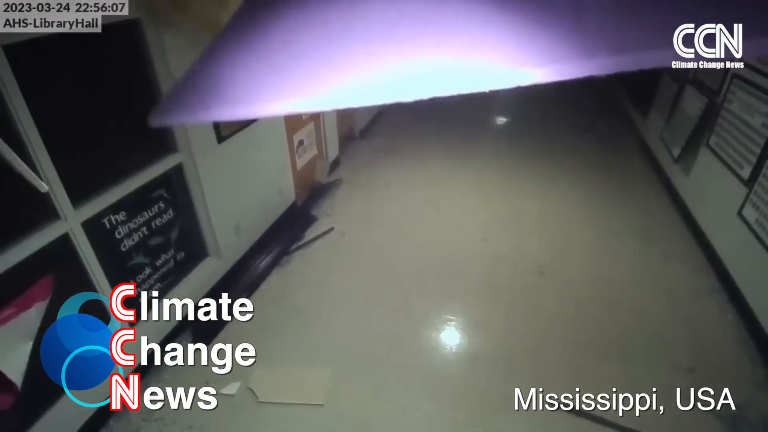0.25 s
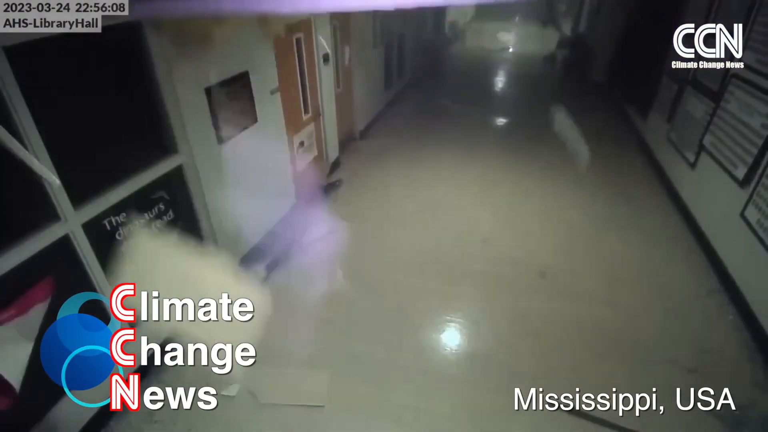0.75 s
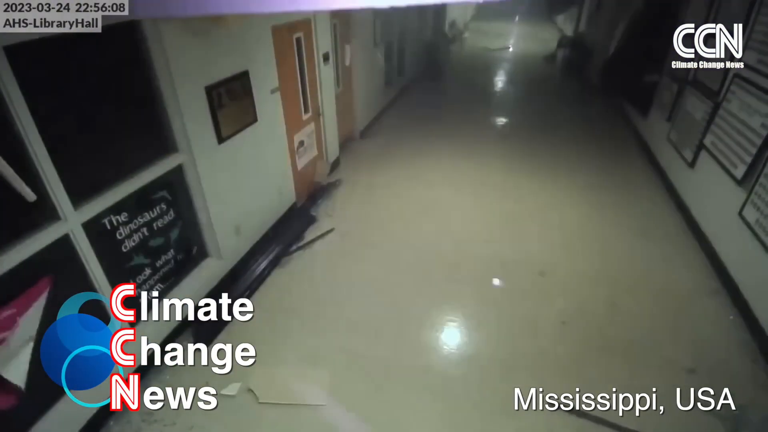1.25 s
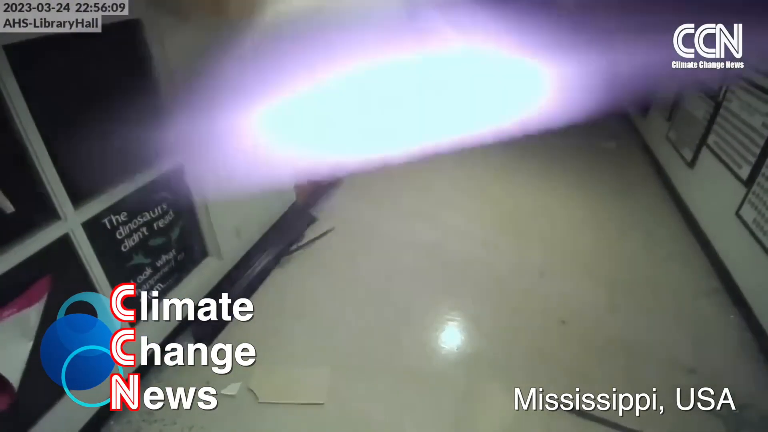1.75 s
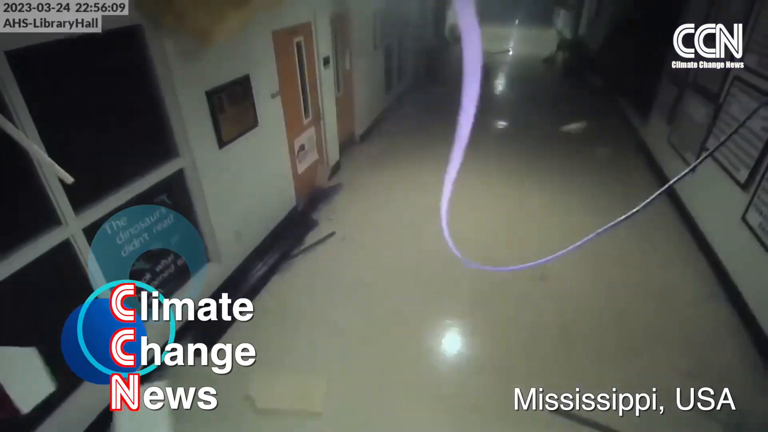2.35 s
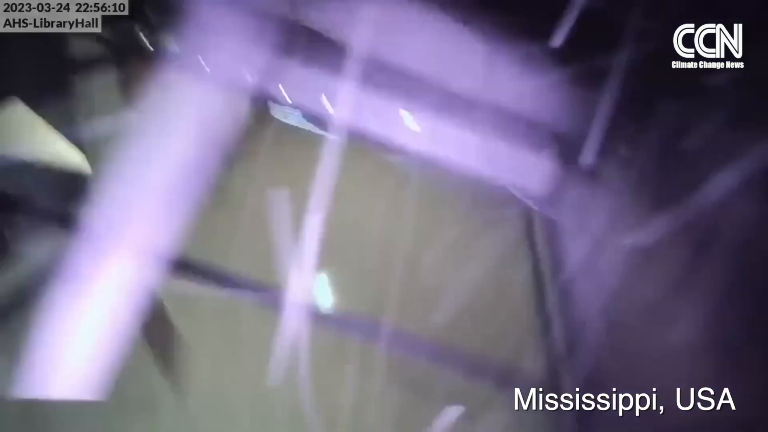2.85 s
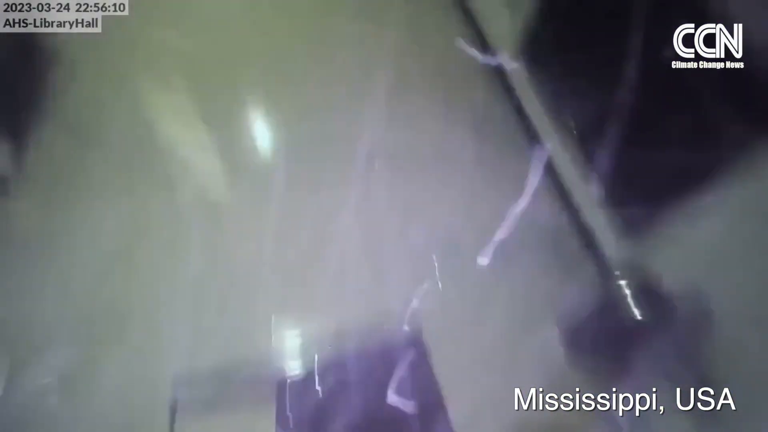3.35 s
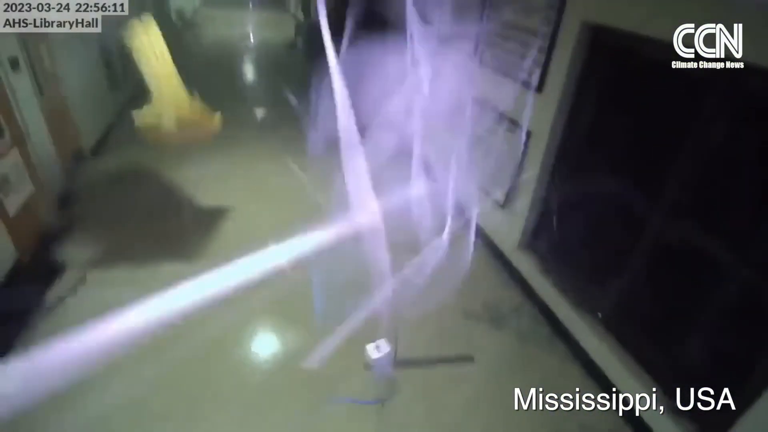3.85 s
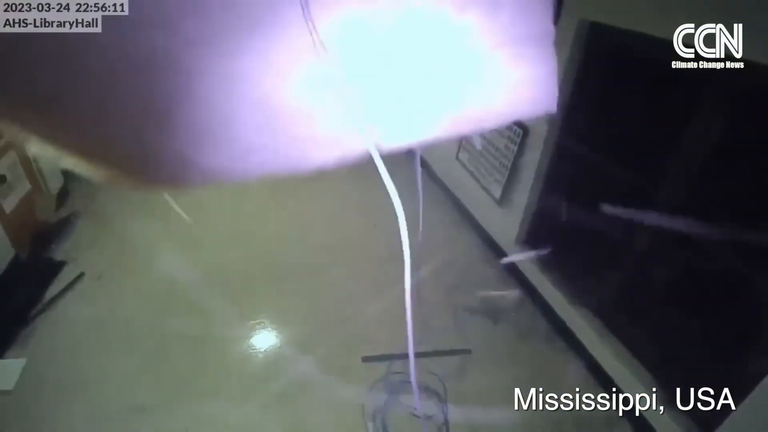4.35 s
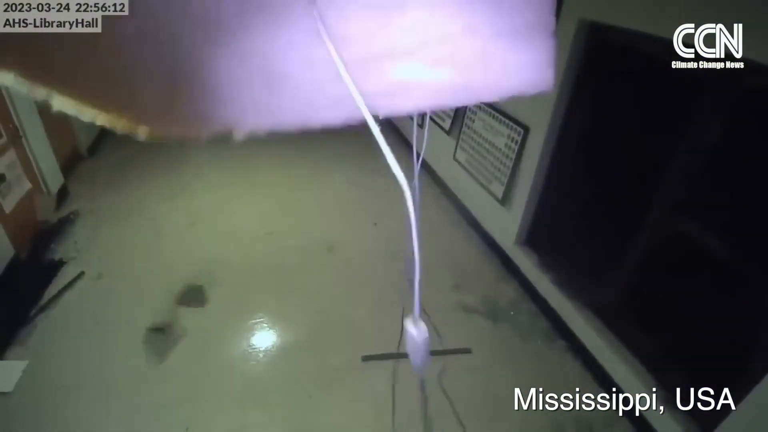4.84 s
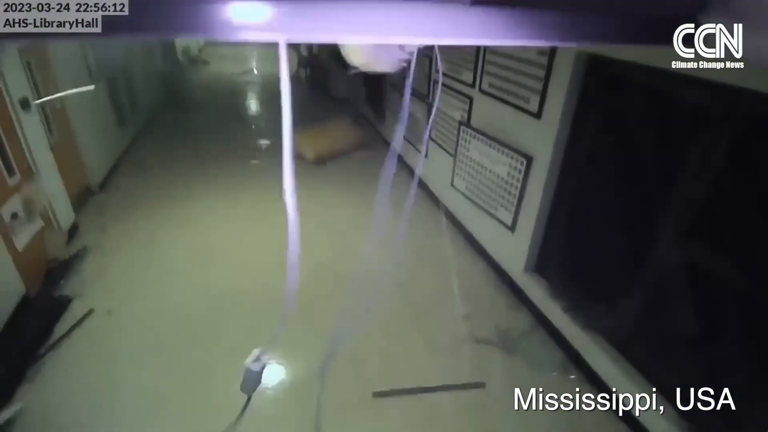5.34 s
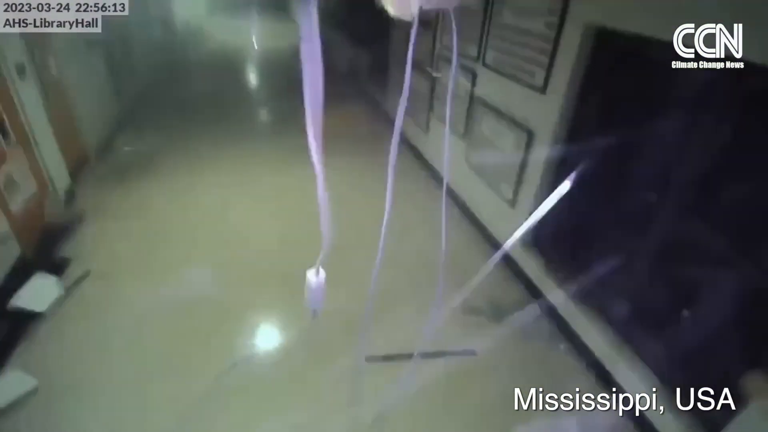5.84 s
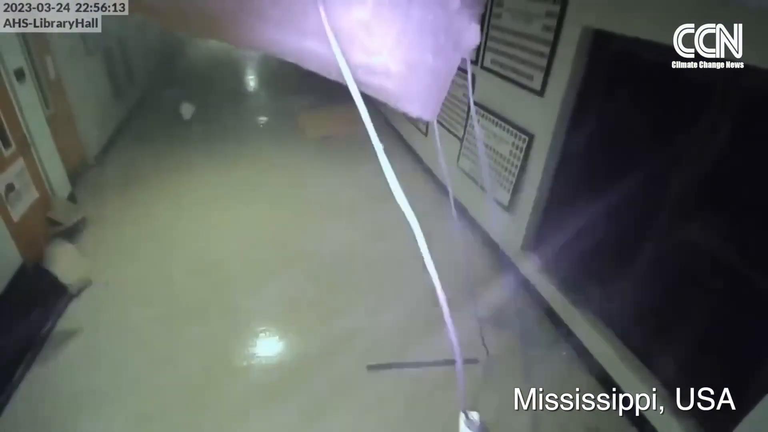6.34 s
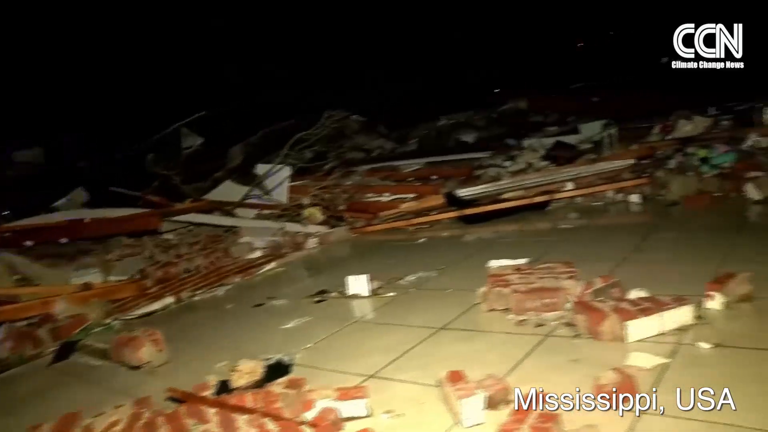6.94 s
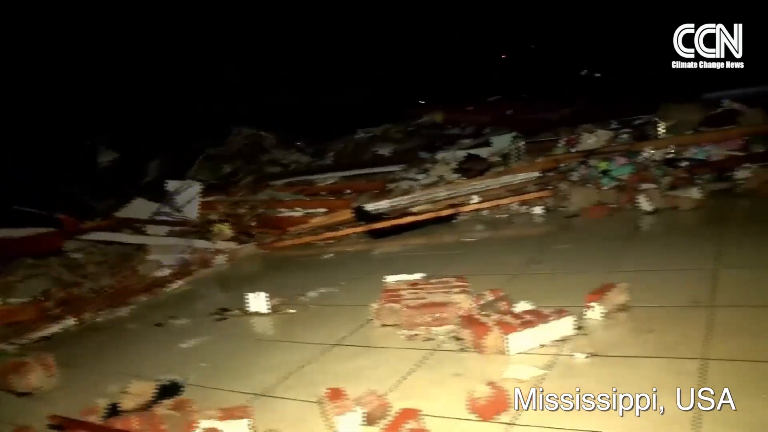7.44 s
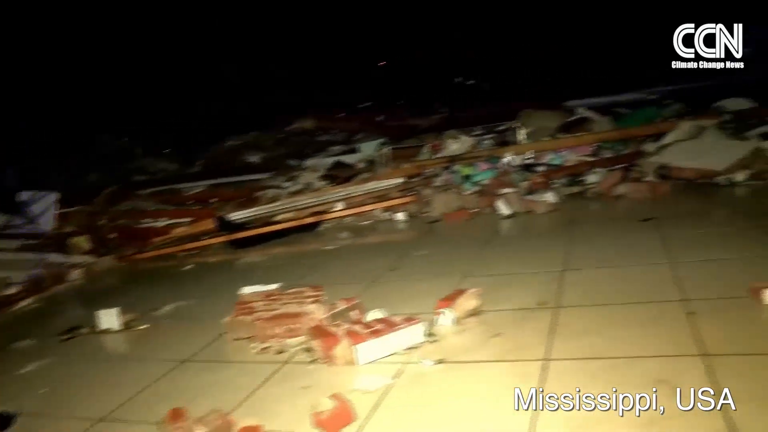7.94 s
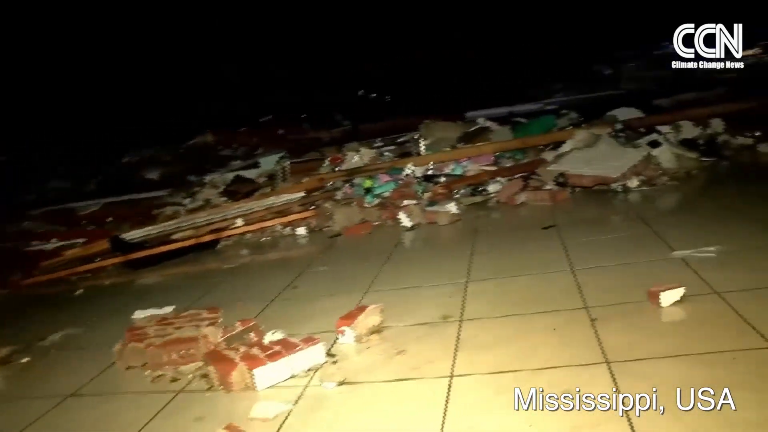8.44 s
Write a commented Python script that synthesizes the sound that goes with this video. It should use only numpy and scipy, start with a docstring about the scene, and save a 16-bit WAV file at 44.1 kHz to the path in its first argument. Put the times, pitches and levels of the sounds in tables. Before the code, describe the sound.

From the first instant, tornado wind tears through a hallway, overloading a fixed microphone into flat, crackling, dull-topped distortion in both channels. Heavy gusts pound at 0.1-0.4 s; a hollow low howl swells near 0.7 s and fades. From 1.2 to about 2.9 s the buffeting is fiercest, with hard pushes that choke the hiss and break into sputters. Around 3-3.5 s bright debris scrapes and a rapid panel flutter pass. From 3.7 to 5.3 s dusty hiss shows between separate surges, one strong near 4.75 s. Flapping beats return at 5.5-6 s, with a sharp scrape at 6.2 s. At 6.67 s everything cuts to quiet outdoors, left channel only: faint rush, thin whines, small bumps and metal clinks around 7-7.2 s, a dull handling knock near 7.8 s, then soft puffy gusts around 8-8.2 s and light bumps until the end.

```python
"""A school hallway in a tornado: turbulent pressure drives a security camera's microphone from rail to rail, and
the hiss of dust and debris comes through where the buffeting eases. Then a sudden cut to the wreckage outdoors:
soft gusts bump a hand-held microphone over a faint rush, on the left channel only. Wind is noise shaped by eddy
rate, debris is banded noise, loose metal is a sum of modes; the hallway is hard-clipped, with added noise that
follows the clipped signal's slope."""
import sys
import numpy as np
from scipy import signal
from scipy.fft import rfft, irfft, next_fast_len
from scipy.io import wavfile
from scipy.ndimage import uniform_filter1d, map_coordinates

SR = 44100
rng = np.random.default_rng(int(sys.argv[2]) if len(sys.argv) > 2 else 0)


def dump_mix(stems):
    """Bounce the given channels to the path in sys.argv[1] as a 16-bit WAV at rate SR."""
    frames = np.atleast_2d(stems).T  # one column per channel
    limited = np.clip(frames, -1, 1)  # hard clip at full scale
    pcm = np.round(limited * 32767).astype(np.int16)
    wavfile.write(sys.argv[1], SR, pcm)


N = 383229
TIME = np.arange(N) / SR  # s
CUT_S = 6.673  # the hallway gives way to the outdoors
HALLWAY_TOP_HZ, TOP_HZ = 6200, 15000  # band limits of the hallway part and of the whole sound

# Modes of a loose metal sheet. Each row: frequency in Hz, level in dB.
SHEET = [(4320, 2), (7480, -3), (9950, -6)]
# Modes of a loose metal rod. Each row: frequency in Hz, level in dB.
ROD = [(7570, 2), (8140, 0), (8450, -2), (9400, -4), (10530, -13)]


def amp(db):
    """A level in decibels is twenty times the logarithm of the gain returned here."""
    return 10 ** (np.asarray(db) / 20)


def unit(x):
    """Dividing by the root mean square gives a signal of rms 1."""
    return x / np.sqrt(np.mean(x ** 2) + 1e-20)


def gain(points, hz):
    """A frequency response drawn through (Hz, dB) points, straight on a logarithmic frequency axis."""
    point_hz, point_db = np.transpose(points)
    return amp(np.interp(np.log(hz + 1), np.log(point_hz + 1), point_db))


def curves(rows):
    """Linear interpolation in time: one value per sample for each column after the time."""
    s, *columns = np.transpose(rows)
    return [np.interp(TIME, s, column) for column in columns]


def wobble(rate):
    """A smooth random process: a spline through Gaussian knots, rate of them per second."""
    knots = rng.standard_normal(int(N * rate / SR) + 4)
    return map_coordinates(knots, [TIME * rate])


def filtered(x, response):
    """Linear filtering: the spectrum is multiplied by a response of frequency."""
    size = next_fast_len(N + SR // 4)
    spectrum = rfft(x, size) * response(np.fft.rfftfreq(size, 1 / SR))
    return irfft(spectrum, size)[..., :N]


def below(x, top_hz):
    """Band limiting by a very steep low-pass without phase shift."""
    return filtered(x, lambda hz: 1 / np.sqrt(1 + (hz / top_hz) ** 120))


def hiss(spectrum, top_hz):
    """Coloured noise: white noise through a spectral envelope, band-limited, of rms 1."""
    coloured = filtered(rng.standard_normal(N), lambda hz: gain(spectrum, hz))
    return unit(below(coloured, top_hz))


def band(hz, width):
    """Narrow-band noise of rms 1, its response at half amplitude across width in Hz."""
    return unit(filtered(rng.standard_normal(N), lambda f: 1 / (1 + (2 * (f - hz) / width) ** 2)))


def patchy(x, depth_db):
    """Time-frequency modulation: random gain in patches a few hundred Hz wide and some 40 ms long."""
    z = signal.stft(x, nperseg=512)[2]
    across_hz = uniform_filter1d(rng.standard_normal(z.shape), size=3, axis=0)
    field = uniform_filter1d(across_hz, size=7, axis=1)
    return unit(signal.istft(z * amp(depth_db * unit(field)), nperseg=512)[1][:N])


def swell(s, length, rise_share=0.43, flat_top=2.3):
    """A bell envelope from 0 to 1 and back, peaking at s; length is its width at half height."""
    # rise_share of the length is build-up; a higher flat_top holds longer and drops faster
    half_width = length * np.where(TIME < s, rise_share, 1 - rise_share)
    away = np.abs(TIME - s) / half_width
    return .5 ** np.minimum(away ** flat_top, 20)


def since(s):
    """Elapsed time in seconds since a moment, zero before it."""
    return np.maximum(TIME - s, 0)


def turbulence(eddy_hz, colour, fall, low_hz, size=1024):
    """Turbulent pressure of rms 1: level up to the eddy rate, falling as a power of frequency above it."""
    overlap = size * 3 // 4
    hz, t, z = signal.stft(rng.standard_normal(N), SR, nperseg=size, noverlap=overlap)
    ratio = hz[:, None] / np.interp(t, TIME, eddy_hz)
    shape = 1 / np.sqrt(1 + ratio ** (2 * fall))
    shaped = z * shape / np.linalg.norm(shape, axis=0)
    pressure = signal.istft(shaped, SR, nperseg=size, noverlap=overlap)[1][:N]
    # the microphone passes no steady pressure
    return unit(filtered(pressure, lambda f: gain(colour, f) * f ** 2 / (f ** 2 + low_hz ** 2)))


def gusting(steady_db, steady_hz, gusts):
    """Unsteady flow: each gust shifts the wind's level and pulls its eddy rate towards the gust's own."""
    level_db, eddy_hz = steady_db, steady_hz
    for s, length, rise_db, hz in gusts:
        bell = swell(s, length)
        level_db = level_db + rise_db * bell
        eddy_hz = eddy_hz + (hz - eddy_hz) * bell
    return level_db, eddy_hz


def scrapes(rows, width_share=.55, rasp_db=3.5):
    """Friction noise: debris rasps in bands at its own pitch, roughened by fast random modulation."""
    rasp = amp(rasp_db * wobble(250))
    return rasp * sum(amp(db) * swell(s, length) * band(hz, width_share * hz) for s, length, db, hz in rows)


def whines():
    """Narrow bands of noise, heard as thin tones that come and go in the distant rush."""
    # Each row: peak in seconds, length in seconds, frequency in Hz, width in Hz, level in dB before the rush's.
    whine_rows = [(6.95, .9, 290, 45, -44), (6.72, .25, 1396, 45, -50), (7.15, .6, 3192, 24, -60)]
    return sum(amp(db) * swell(s, length) * band(hz, width) for s, length, hz, width, db in whine_rows)


def distant_rush(night_db=-45):
    """Broadband noise of the night air, with the whines, under one slow level envelope."""
    # Each row: frequency in Hz, relative level in dB per Hz.
    night_spectrum = [(150, -18), (290, -14), (400, -6), (900, 7), (1200, -3.5), (1420, 3), (1900, -9.5),
                      (3200, -6), (3800, -12), (5400, -15.5), (7200, -15), (9500, -25), (13000, -37)]
    # Each row: time in seconds, level change in dB.
    rush_course = [(6.7, 1.5), (7.3, 0.5), (7.42, 6.5), (7.6, 2), (8.1, 2.5), (8.28, -5), (8.6, -3.5)]
    rush_db, = curves(rush_course)
    night = amp(night_db) * patchy(hiss(night_spectrum, TOP_HZ), depth_db=1.0)
    return amp(rush_db) * (night + whines())


def rustles():
    """Friction noise of small pieces of rubble outdoors."""
    # Each row: peak in seconds, length in seconds, peak level in dB before the rasp, frequency in Hz.
    rustle_rows = [(7.1, 0.18, -44, 1400), (7.403, .025, -44, 3000), (8.45, .05, -48, 1250)]
    return scrapes(rustle_rows)


def clinks(t60=0.33, jitter_hz=28):
    """Modal ringing: loose metal sounds decaying modes that waver as it shifts, new strengths each touch."""
    # Each row: start in seconds, mean level in dB, modes of the piece.
    clink_rows = [(7.0, -48, SHEET), (7.17, -50, ROD), (7.225, -55, ROD), (7.72, -56, ROD)]
    out, t = np.zeros(N), np.arange(SR // 2) / SR
    for s, db, modes in clink_rows:
        for hz, level in modes:
            phase = 2 * np.pi * np.cumsum(hz + jitter_hz * wobble(200)[:len(t)]) / SR
            strength_db = db + level + rng.normal(0, 1.8)
            ring = amp(strength_db - 60 * t / t60) * np.sin(phase)
            out[round(s * SR):][:len(t)] += ring * (1 - np.exp(-t / .004))
    return out


def knock(start_s=7.776, level_db=-16, t60=0.06):
    """Handling noise: a dull burst with a soft start and an exponential decay."""
    # Each row: frequency in Hz, relative level in dB per Hz.
    knock_spectrum = [(300, -6), (1400, -6), (3000, -21), (6000, -37), (12000, -66)]
    age = since(start_s)
    soft_start = np.tanh(age / .002) ** 2
    decay = amp(level_db - 60 * np.minimum(age / t60, 2))
    return soft_start * decay * hiss(knock_spectrum, TOP_HZ)


def bumps():
    """Pressure pulses on the microphone: each is a low swing under a bell that dies at once."""
    # Each row: peak in seconds, level in dB, frequency in Hz, length in seconds.
    bump_rows = [(7.007, -11, 110, 0.0051), (7.072, -9.5, 110, 0.0039), (7.089, -6.5, 100, 0.0057),
                 (7.107, -9, 160, 0.0034), (7.499, -9.5, 75, 0.02), (7.726, -11.5, 160, 0.003),
                 (7.75, -5, 150, 0.0057), (7.781, -14, 130, 0.013), (8.36, -6, 190, 0.0046),
                 (8.491, -11, 110, 0.0085)]
    return sum(amp(db) * swell(s, length) * np.cos(2 * np.pi * hz * (TIME - s))
               for s, db, hz, length in bump_rows)


def breeze(eddy_rate_hz=134):
    """Wind noise outdoors: turbulent pressure whose level and eddy rate follow the gusts, in lumps."""
    # The light breeze. Each row: time in seconds, buffeting level in dB.
    breeze_course = [(6.72, -36.5), (6.98, -33.5), (7.02, -26.5), (7.68, -28), (8.22, -31), (8.26, -34),
                     (8.32, -29.5), (8.66, -28.5)]
    # Gusts on top. Each row: peak in seconds, length in seconds, rise in dB, eddy rate in Hz.
    gust_rows = [(7.1, 0.096, 7, 114), (7.37, 0.076, 8, 254), (7.752, 0.048, 8.5, 170),
                 (7.817, 0.066, 9.5, 375), (7.99, 0.22, 12, 345), (8.126, 0.029, 4.5, 251),
                 (8.188, 0.071, 14, 272), (8.36, 0.06, 4, 270), (8.451, 0.068, 5.5, 239)]
    # The outdoor microphone's colour. Each row: frequency in Hz, gain in dB.
    port_colour = [(20, -4), (75, -2), (150, -2.5), (290, 2.5), (480, 3.5), (680, 3.5), (1500, 5.5),
                   (1850, 4), (3000, 5.5), (8000, 1), (13000, -12)]
    breeze_db, = curves(breeze_course)
    buffet_db, eddy_hz = gusting(breeze_db, eddy_rate_hz, gust_rows)
    lumps = amp(2.26 * wobble(110))
    return amp(buffet_db) * lumps * turbulence(eddy_hz, port_colour, fall=2.27, low_hz=22)


def outdoors():
    """Superposition of wind noise, bumps and small wreckage sounds over a faint distant rush."""
    return distant_rush() + rustles() + clinks() + knock() + bumps() + breeze()


def debris_hiss(debris_db):
    """Many small impacts merge into broadband noise: dust and debris in the air, patchy and flickering."""
    # Each row: frequency in Hz, relative level in dB per Hz.
    debris_spectrum = [(100, -6), (400, 6.5), (600, 3.5), (820, 6), (1200, -4), (1900, 2), (2300, -2),
                       (2750, 3), (3200, -3.5), (3800, 1.5), (4400, 2), (5000, 1), (5700, 3)]
    flicker_db = 0.21 * wobble(60) + 1.1 * wobble(7)
    return amp(debris_db + flicker_db) * patchy(hiss(debris_spectrum, HALLWAY_TOP_HZ), depth_db=2.0)


def flurries():
    """Enveloped noise: clouds of debris swell and pass with a harsher rush."""
    # Each row: peak in seconds, length in seconds, peak level in dB.
    flurry_rows = [(2.573, 0.11, -11.5), (2.836, 0.044, -2.5), (3.55, 0.27, -10.5), (5.87, 0.26, -11.5),
                   (6.538, 0.15, -14)]
    # Each row: frequency in Hz, relative level in dB per Hz.
    flurry_spectrum = [(100, 4), (400, 6.5), (850, 4.5), (1300, -4.5), (2200, -1), (2800, 0.5), (4200, -7),
                       (5500, -7)]
    envelope = sum(amp(db) * swell(s, length) for s, length, db in flurry_rows)
    return envelope * hiss(flurry_spectrum, HALLWAY_TOP_HZ)


def close_scrapes():
    """Friction noise of debris close to the camera, in bright bands."""
    # Each row: peak in seconds, length in seconds, peak level in dB before the rasp, frequency in Hz.
    scrape_rows = [(2.986, 0.027, -11, 2470), (3.085, 0.04, -10.5, 4500), (3.351, 0.032, -12, 3740),
                   (3.5, 0.17, -16, 2940), (6.217, 0.014, -0.5, 3140), (6.256, 0.052, -16.5, 2610),
                   (6.36, 0.028, -12.5, 2425)]
    return scrapes(scrape_rows)


def howl(peak_s=.67, peak_db=-4.5, rise_db_per_s=39.5, fall_db_per_s=18.5):
    """Duct resonance: noise around the hallway's hollow tone builds and dies exponentially."""
    # Each row: frequency in Hz, relative level in dB per Hz.
    duct_spectrum = [(60, -36.5), (130, -8), (165, -2.5), (215, -2), (300, -14), (700, -43.5)]
    howl_db = peak_db - np.maximum(rise_db_per_s * (peak_s - TIME), fall_db_per_s * (TIME - peak_s))
    return amp(howl_db) * hiss(duct_spectrum, HALLWAY_TOP_HZ)


def flutter(waver_octaves=.45):
    """Aeroelastic flutter: loose ceiling panels flap and beat the air back and forth at an uneven rate."""
    # Each row: peak in seconds, length in seconds, peak level in dB, flaps per second before wavering.
    flutter_rows = [(3.449, 0.12, -2.5, 52.5), (5.552, .2, 4, 52), (5.957, 0.21, 1, 58)]
    drift = np.cumsum(2 ** (waver_octaves * wobble(70))) / SR  # time that runs unevenly
    return sum(amp(db) * swell(s, length) * np.sin(2 * np.pi * hz * drift)
               for s, length, db, hz in flutter_rows)


def shoves(push_db=27, burst_s=0.0042):
    """One-sided pressure: a hard push of air swells and holds, then breaks up into a rattle of small eddies."""
    # Each row: burst in seconds, hold before it in seconds, burst level in dB.
    shove_rows = [(0.185, 0.013, 15.5), (1.305, 0.01, 19.5), (1.501, .013, 16.5), (1.631, 0.011, 17.5),
                  (1.835, 0.018, 19), (2.628, .013, 10), (2.655, 0.009, 16.5), (2.749, .012, 9),
                  (2.913, 0.018, 10), (2.94, .014, 14.5), (3.38, 0.012, 4.5), (3.404, 0.012, 6),
                  (5.666, 0.011, 8), (5.893, .013, 4.5)]
    # Eddies in a burst. Each row: frequency in Hz, relative level in dB per Hz.
    burst_spectrum = [(100, 3.5), (600, 8.5), (1500, -7), (3000, -12), (5500, -29.5)]
    push, bursts = np.zeros(N), np.zeros(N)
    sides = rng.choice([-1, 1], len(shove_rows))
    for (s, hold, db), side in zip(shove_rows, sides):
        # half an ellipse that ends at the burst
        push += side * np.sqrt(np.clip(1 - (2 * (TIME - s) / hold + 1) ** 2, 0, 1))
        bursts += amp(db) * (TIME > s) * np.exp(-np.minimum(since(s) / burst_s, 20))
    return amp(push_db) * push + bursts * hiss(burst_spectrum, HALLWAY_TOP_HZ)


def buffeting(storm_db, heave_db=-7, heave_growth=0.39, fine_db=-.5):
    """Eddy shedding: stronger wind sheds faster eddies, up to a limit, while the whole air mass heaves."""
    # Surges on the storm. Each row: peak in seconds, length in seconds, rise in dB, eddy rate in Hz.
    surge_rows = [(0.059, 0.081, 7.5, 256), (0.196, 0.072, 15.5, 334), (0.389, 0.021, 14, 146.7),
                  (1.012, 0.059, 5, 143), (1.4, 0.27, -2, 345), (2.929, 0.11, 2.5, 127.6),
                  (3.402, 0.048, 8, 167.7), (3.889, 0.16, 4.5, 304), (4.197, 0.055, 0, 282),
                  (4.328, .08, 4.5, 168), (4.649, 0.06, 6, 371), (4.755, 0.1, 12, 113.2),
                  (4.947, 0.076, 2.5, 325), (6.432, 0.11, 6, 160), (6.508, 0.086, 2.5, 367)]
    # The hallway's colour. Each row: frequency in Hz, gain in dB.
    hall_colour = [(20, 0.5), (40, 3), (58, 1.5), (75, 3.5), (105, -0.5), (170, 0), (400, -1), (1000, 3),
                   (3000, -1)]
    # The wind drops away for an instant: peak in seconds, length in seconds, change in dB.
    lull_row = (0.73, 0.015, -13)
    # an octave slower per 7 dB below about -0.7 dB, held at 280 Hz above it, before surges and clumps
    storm_hz = np.minimum(300 * 2 ** (storm_db / 7), 280)
    buffet_db, eddy_hz = gusting(storm_db, storm_hz, surge_rows)
    lull_s, lull_length, drop_db = lull_row
    lull_db = drop_db * swell(lull_s, lull_length)
    # small eddies come in clumps
    clumps = 2 ** (0.26 * wobble(45) + 0.25 * wobble(140))
    fine = turbulence(eddy_hz * clumps, hall_colour, fall=1.814, low_hz=15.8, size=512)
    eddies = amp(fine_db + 1.2 * wobble(25)) * fine
    # the harder it blows, the larger the share of slow heaving
    slow = turbulence(np.full(N, 60), hall_colour, fall=2.5, low_hz=20.3)
    heave = amp(heave_db + heave_growth * buffet_db) * slow
    return amp(buffet_db + lull_db) * (eddies + heave)


def tornado():
    """Superposition of debris, howl, flutter and buffeting, far louder than the camera can take."""
    # The slow course of the blast. Each row: time in seconds, buffeting level in dB, debris level in dB.
    storm_course = [(0, -1, -16), (.3, -4.5, -12.5), (.6, -1, -11), (.85, -4, -12.5), (1.2, 6, -14.5),
                    (1.75, 5.5, -15), (2.05, 5, -13), (2.93, 1.5, -14.5), (2.99, -2.5, -9),
                    (3.1, -5.5, -11.5), (3.7, -6.5, -12), (4.15, -10.5, -12), (4.75, -10, -11),
                    (5.05, -6.5, -12), (5.33, -14, -12.5), (5.5, -0.5, -13.5), (6.3, -2, -8.5),
                    (6.64, -11.5, -12)]
    storm_db, debris_db = curves(storm_course)
    debris = debris_hiss(debris_db) + flurries() + close_scrapes()
    return debris + howl() + flutter() + shoves() + buffeting(storm_db)


def overloaded(pressure, rail=0.47, noise_db=-1.5, steady_db=-22.5):
    """Hard clipping: a push pins the input to a rail and blots out the hiss; noise follows the signal's slope."""
    # Added noise. Each row: frequency in Hz, relative level in dB per Hz.
    noise_spectrum = [(100, 8), (700, 0.5), (2000, -0.5), (3500, -2.5), (5000, -4.5), (5400, 0)]
    # Treble roll-off of the hallway part. Each row: frequency in Hz, gain in dB.
    treble_rolloff = [(1000, 0), (5080, -1.55), (5250, -6), (5500, -11.5), (5690, -10), (5820, -25),
                      (6200, -37.5)]
    pinned = below(np.clip(pressure, -rail, rail), HALLWAY_TOP_HZ)
    # rms slope over about 10 ms: the noise is louder where the clipped signal changes fast
    slope = np.sqrt(np.abs(uniform_filter1d(np.gradient(pinned) ** 2, size=450)))
    noise_level = np.hypot(amp(noise_db) * slope, amp(steady_db))
    noise = noise_level * patchy(hiss(noise_spectrum, HALLWAY_TOP_HZ), depth_db=1.0)
    return below(filtered(pinned + noise, lambda hz: gain(treble_rolloff, hz)), HALLWAY_TOP_HZ)


def scene():
    """Two scenes in succession: the hallway in both channels, then the outdoors in the left one."""
    inside = np.clip((CUT_S - TIME) / .002, 0, 1)  # a 2 ms crossfade
    hallway = inside * overloaded(tornado())
    left = hallway + (1 - inside) * outdoors()
    return np.array([left, hallway])


def record(dry):
    """Band limiting: almost nothing is kept above the top frequency."""
    return below(dry, TOP_HZ)


dry = scene()
out = record(dry)
dump_mix(out)
```